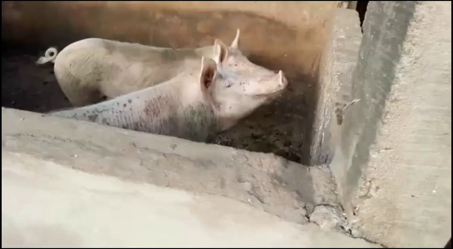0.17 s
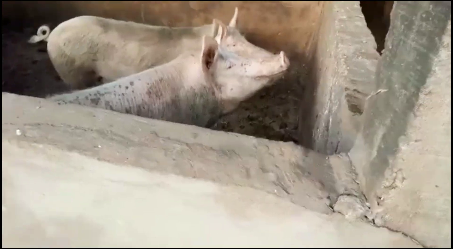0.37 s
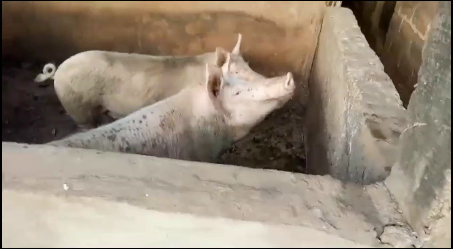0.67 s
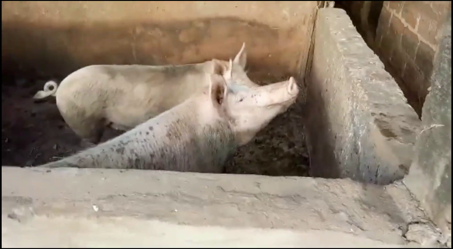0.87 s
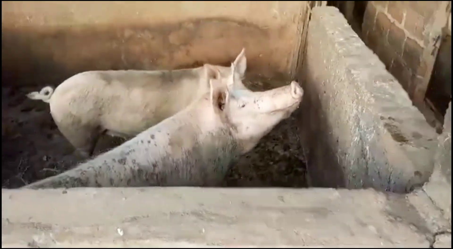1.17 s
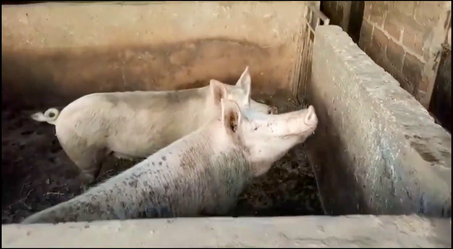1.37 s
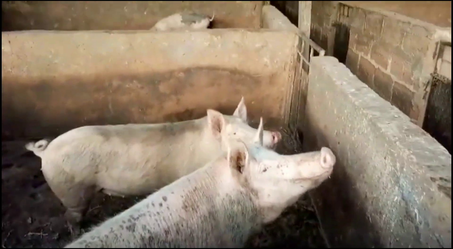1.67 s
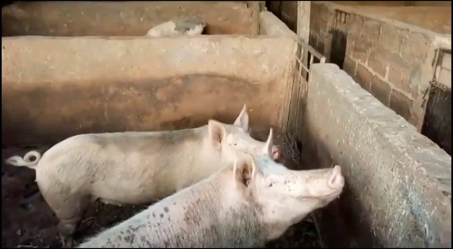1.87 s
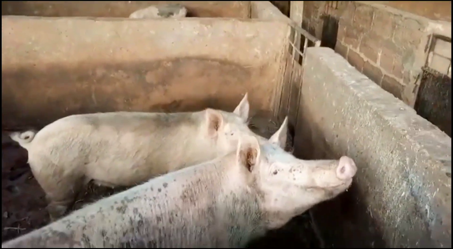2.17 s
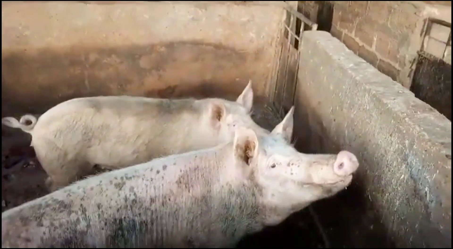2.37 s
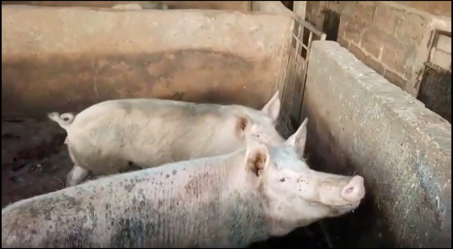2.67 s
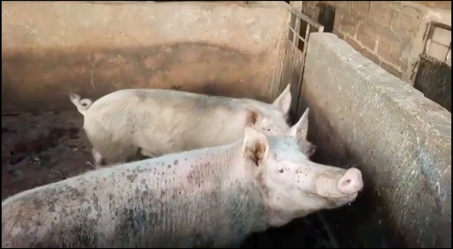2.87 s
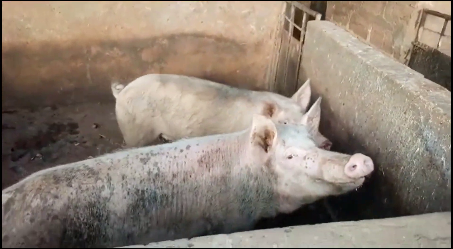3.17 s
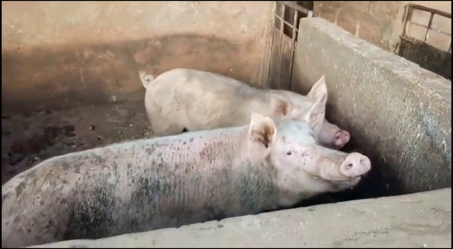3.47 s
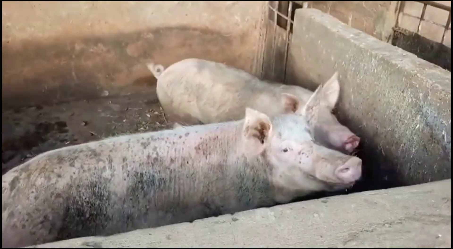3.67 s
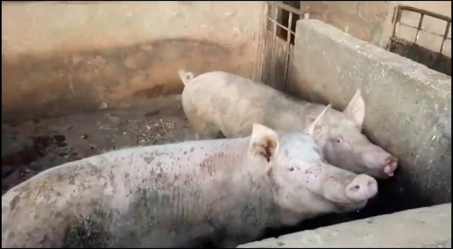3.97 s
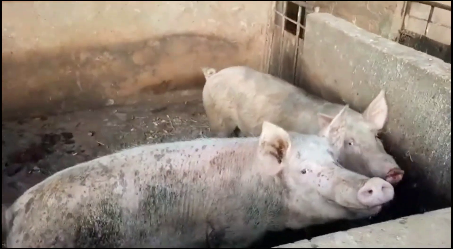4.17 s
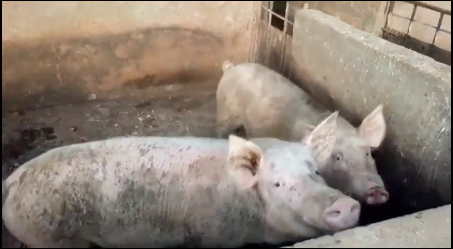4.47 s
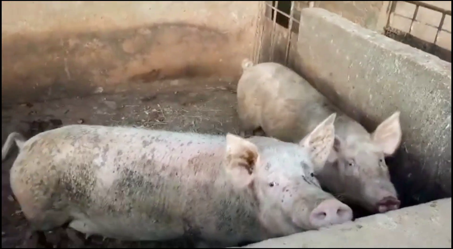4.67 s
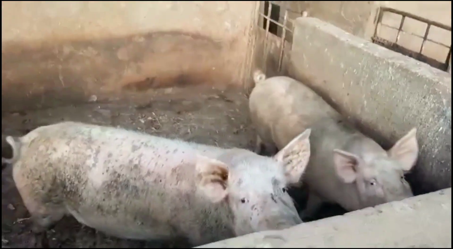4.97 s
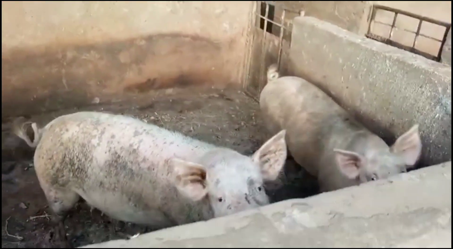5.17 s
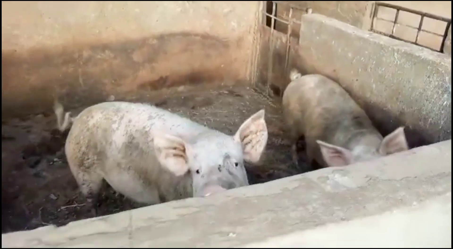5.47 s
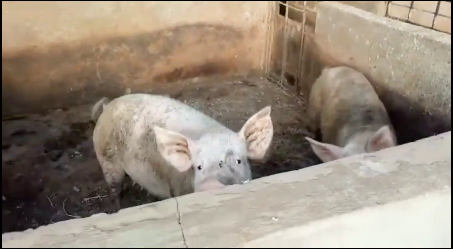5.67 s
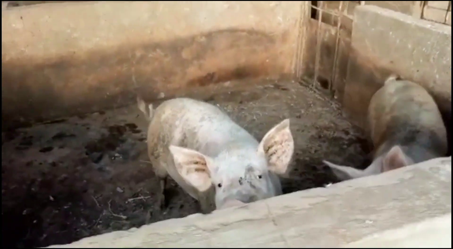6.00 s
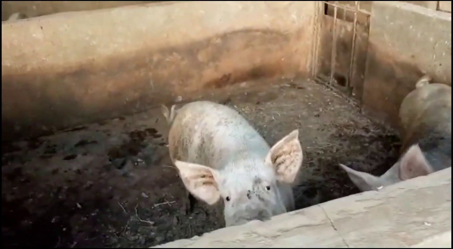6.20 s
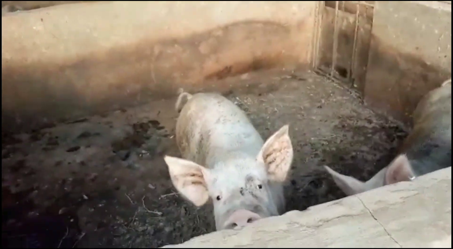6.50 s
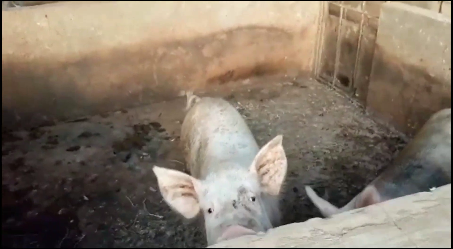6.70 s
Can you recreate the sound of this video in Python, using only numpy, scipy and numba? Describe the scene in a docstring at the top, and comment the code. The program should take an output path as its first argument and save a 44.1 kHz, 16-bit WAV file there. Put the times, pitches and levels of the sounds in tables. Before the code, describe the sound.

Close pigs in a small concrete pen. After a second of quiet yard murmur with light puffs and rustles, three soft low grunts come, then a sharp short bark and a quick run of loud nasal grunts about every half second. Three breathier, spaced grunts follow, with snuffling air between. Short wall echo, a faint distant cricket, one handheld microphone nearby.

```python
"""Two pigs grunting in a concrete pen

Slow flaps of the vocal folds ring a long throat, mouth and snout, and air hisses through the nostrils.
Between grunts come voiceless breaths; grainy noise bursts puff and rustle close by, and an animal
moans faintly far off. Feedback delays echo off the pen walls and a few resonances hum along.
Behind this a cricket whistles short falling chirps, and flickering bands of noise make the yard's murmur.
"""
import sys
import numpy as np
from scipy import signal
from scipy.fft import rfft, irfft, next_fast_len
from scipy.io import wavfile
from numba import njit

SR = 44100
rng = np.random.default_rng(int(sys.argv[2]) if len(sys.argv) > 2 else 0)


def linear_from_db(decibels):
    """Turn decibels (scalar or array-like) into linear amplitude factors; 0 gives 1."""
    return 10 ** (np.asarray(decibels, float) / 20)


def generate_wav(sig):
    """Save sig (samples, or channels by samples) to the path in sys.argv[1] as 16-bit PCM at SR."""
    pcm = np.round(np.clip(np.atleast_2d(sig).T, -1, 1) * 32767).astype(np.int16)
    wavfile.write(sys.argv[1], SR, pcm)


N = 301644

# The grunts in order. Each row: first flap in seconds, flaps per second at the opening, flaps per second
# once steady, stretch of the resonances (factor), snout tilt in dB per kHz.
GRUNT_CALLS = [(1.245, 43, 42, 0.91, 3), (1.812, 45.8, 44, 0.93, -3), (2.314, 55, 45, 0.97, 7),
               (2.671, 52, 50, 1.25, 1), (2.779, 52, 79.4, 1.095, 4.5), (3.119, 51.3, 70.5, 0.95, -4.5),
               (3.57, 56.4, 53, 1.01, -5.5), (4.033, 47.5, 69.5, 1.034, -5), (4.581, 55, 53.5, 0.986, -3),
               (5.2429, 48.3, 47.5, 1, 5.5), (5.826, 58.5, 48.4, 0.98, -0.5),
               (6.376, 61.7, 49.2, 0.99, -4.5)]
# How hard each grunt is pushed, one curve a grunt. Each row: time in seconds, effort in dB,
# mouth opening in dB against effort, snout rasp in dB against the mouth.
EFFORT_CURVES = [
    [(1.24, -52, 1, -24), (1.246, -51, 8.5, -24), (1.31, -49.5, 3.5, -22), (1.324, -60, -11, -28),
     (1.33, -57, -14, -27)],
    [(1.79, -55, -8, -17), (1.82, -47, 0, -18), (1.91, -43, 4.5, -16), (1.972, -54, -14, -17),
     (1.98, -63, -1, -12)],
    [(2.31, -52, 2, -15), (2.394, -41, -3.5, -14), (2.442, -42, -1.5, -14), (2.456, -53, -9, -17),
     (2.48, -61, -15, -20)],
    [(2.663, -61, -9, -30), (2.669, -49, -5, -27), (2.743, -48.5, -14, -27), (2.757, -56, -5, -27),
     (2.765, -37, -19, -23)],
    [(2.77, -46, -8, -20), (2.778, -31.5, -11, -6), (2.8, -24.5, -3.5, -15), (2.835, -27, -7, -10),
     (2.85, -40, -9, -3), (2.88, -53, -6, -21)],
    [(3.11, -63, -26, -15), (3.122, -39.5, -8.5, -12), (3.172, -25.5, -3.5, -14), (3.21, -26.5, -1, -11.5),
     (3.262, -26.5, -2.5, -13.5), (3.275, -28, -8.5, -13), (3.33, -49, -10, -20)],
    [(3.563, -67, 1, -15), (3.575, -46, -5, -5), (3.593, -30, -11.5, -3), (3.612, -30, -13, -8),
     (3.65, -27, -4.5, -6.5), (3.707, -29, -3, -2.5), (3.728, -27.5, -7, -11), (3.742, -35.5, -15, -10),
     (3.78, -44, -10, -10)],
    [(4.025, -58, -8, -31), (4.053, -26.5, -17.5, -20.5), (4.078, -26, -9.5, -23), (4.109, -25, 0.5, -17.5),
     (4.175, -23.5, -11, -9), (4.198, -24, -8.5, -10), (4.212, -34, -4.5, -16), (4.23, -39.5, 2.5, -15)],
    [(4.575, -60, 7.5, -28), (4.605, -43.5, 1, -26), (4.625, -31.5, -5, -9.5), (4.68, -28.5, -3.5, -1),
     (4.735, -28, -2.5, -4), (4.8, -41, -6.5, -5.5)],
    [(5.233, -46, -14, -22), (5.241, -46, -3, -11), (5.291, -34.5, -4, -15), (5.369, -34.5, -2.5, -17.5),
     (5.46, -52, 1, -21)],
    [(5.82, -52, 2, -18), (5.84, -48, -0.5, -18), (5.848, -37, -5, -17), (5.888, -32.5, -5.5, -20),
     (5.91, -35, -7, -13), (5.94, -33, -4, -7), (6.02, -47.5, -4, -11)],
    [(6.368, -48, -8, -18), (6.378, -42.5, -5.5, -18), (6.396, -34, -7.5, -12), (6.412, -32.5, -5, -18),
     (6.5, -30, -6, -5), (6.556, -34, -5, -7.5), (6.62, -48.5, -8.5, -8)],
]


def pigs():
    """Each grunt sounds at its own time, driven by its own curve of effort."""
    out = np.zeros(N)
    for row, curve in zip(GRUNT_CALLS, EFFORT_CURVES):
        at = round(curve[0][0] * SR)
        call = grunt(*row, list(curve))
        out[at:at + len(call)] += call[:N - at]
    return out


# Short grunts are rougher. Each row: length in seconds, roughness 0-1.
ROUGHNESS_BY_LENGTH = [(.1, 0.48), (.2, 0.21)]
# Fast flaps darken the mouth, a bark opens it wide. Each row: flaps per second, mouth tilt in dB per kHz.
VOWEL_TILT_BY_RATE = [(56, 2.5), (68, 0.5), (72, -14), (77, 9.5)]
# How strongly the chest hums. Each row: flaps per second, level in dB against effort.
CHEST_LEVEL_BY_RATE = [(42, 0), (47.5, 0.5), (51, -12.5), (53.5, -1), (60, -18), (71, -10)]
# How strongly flaps in step with the throat sing. Each row: flaps per second, level in dB against effort.
LOCK_LEVEL_BY_RATE = [(66, -28), (69, 2.5), (72, 3), (75, -30)]
# The two lowest snout resonances start high, drop and lift again. Each row: share of the call,
# stretch (factor).
SNOUT_FLARE_CURVE = [(0, 1.3), (.12, 1.3), (.25, 0.975), (.7, 1.01), (1, 1.08)]
# A dull thump under each flap, a row for each airway. Each row: frequency in Hz, first-pass width in Hz,
# level in dB against effort before roughness.
BELLY_THUMPS = [(157, 102, -17.5), (150, 110, -11), (189, 158, -12)]


def grunt(first, opening, steady, stretch, tilt_db, curve):
    """Each fold flap is a click followed by a gust of noise; both ring the airway."""
    second_pig_until_s, head_lowered_s = 2.5, 5
    release_s, tail_s = 0.11, 0.082  # the tail is cut before the release is over
    steady_at_share, last_flaps_share = 0.35, 0.95  # when the rate settles; closing rate against steady
    lowered_rough, belly_rough_db = 0.2, 13.5  # roughness added head down; thump gain at full roughness
    chest_hz, chest_width_hz = 103.7, 37
    # fast steady flaps fall in step with the throat; their tone takes a share from the throat's knocks
    lock_hz, lock_full_at_share, lock_takes_share = 347.3, 0.49, 0.6
    lips_share, lips_per_db = 0.48, 0.004  # share of the stretch; added stretch for each dB of opening

    start, end = curve[0][0], curve[-1][0]
    pig = 1 if first < second_pig_until_s else 2 * (first > head_lowered_s)
    own_rough = np.interp(end - start, *np.transpose(ROUGHNESS_BY_LENGTH))
    rough = own_rough + lowered_rough * (pig == 2)
    t = start + np.arange(round((end - start + tail_s) * SR)) / SR
    along = np.clip((t - first) / (end - first), 0, 1)

    # flaps, each but the first a little early or late
    rate = np.interp(along, [0, steady_at_share, 1], [opening, steady, steady * last_flaps_share])
    cycles = np.cumsum(rate * (t >= first)) / SR
    count = int(cycles[-1]) + 1
    chance = rng.standard_normal((40, 13))[:count]
    flap = np.arange(count)
    flap_cycle = flap + 0.09 * rough * chance[:, 0] * opening / steady * (flap > 0)
    at = np.minimum(np.searchsorted(cycles, flap_cycle + 1e-6), len(t) - 1)

    # every flap drives each resonance differently, the high ones most unevenly
    unevenness_db = np.linspace(1.2, 5.0, 12)
    clicks = np.zeros((12, len(t)))
    clicks[:, at] = linear_from_db(4.1 * rough * chance[:, :1] + unevenness_db * chance[:, 1:]).T
    gust = signal.lfilter([1], [1, -np.exp(-1 / (0.016 * SR))], clicks[-1])  # air flow after each flap
    gust_level = 0.09 * rough * (0.6 + 0.8 * along) * (gust + 0.45)
    gust_share = np.linspace(1, 0.6, 12)[:, None]
    sources = clicks + gust_level * gust_share * rng.standard_normal(len(t))

    effort_db, opening_db, snout_db = in_time(curve + [(end + release_s, -80, 0, -20)], t)
    effort = linear_from_db(effort_db)
    mouth = linear_from_db(effort_db + opening_db)
    snout = mouth * linear_from_db(snout_db)
    # -55 dB at -24 dB effort, following 0.88 of its swing, growing 6 dB; 24 dB more at full roughness
    nostril = linear_from_db(-55 + 0.88 * (effort_db + 24) + 6 * along + 24 * own_rough)

    # glides from the start to the end of the call
    throat_stretch = stretch * (0.94 + (0.98 - 0.94) * along)
    mouth_stretch = (1 + (0.98 - 1) * along) * stretch ** lips_share + lips_per_db * (opening_db + 5)
    nasal_db = 0.5 + (-10 - 0.5) * along
    tilt_swing_db = -8 + (1 + 8) * along  # dB per kHz
    vowel_db = np.interp(steady, *np.transpose(VOWEL_TILT_BY_RATE))
    flare = np.interp(along, *np.transpose(SNOUT_FLARE_CURVE))
    low, mid, high = airway(sources, pig, throat_stretch, mouth_stretch, nasal_db,
                            tilt_db + tilt_swing_db, vowel_db, flare)

    # the chest swells late and rings on
    hum = resonance(effort * sources[0], chest_hz, chest_width_hz)
    hum = resonance(hum, chest_hz, 2 * chest_width_hz)
    hum *= linear_from_db(np.interp(steady, *np.transpose(CHEST_LEVEL_BY_RATE))) * effort.max() / np.abs(hum).max()

    belly_hz, width_hz, belly_db = BELLY_THUMPS[pig]
    thump = resonance(resonance(sources[0], belly_hz, width_hz), belly_hz, 2 * width_hz)
    hiss = nostril_hiss(size=len(t)) * rms_one(gust + 0.7)

    lock = linear_from_db(np.interp(steady, *np.transpose(LOCK_LEVEL_BY_RATE)))
    lock_swell = np.minimum(along / lock_full_at_share, 1) ** 2
    locked = effort * lock * lock_swell * np.sin(2 * np.pi * lock_hz * t)
    throat_level = effort * (1 - lock_takes_share * np.minimum(lock, 1) * along)

    voice = evened(low, throat_level) + evened(mid, mouth) + evened(high, snout)
    body = hum + locked + evened(thump, effort * linear_from_db(belly_db + belly_rough_db * rough))
    return voice + body + evened(hiss, nostril)


# Throat, mouth and snout resonances: a list for the first pig, for the second pig, and for the first with # its
# head lowered. Each row: frequency in Hz, first-pass width in Hz, level in dB.
AIRWAY_RESONANCES = [
    [(347, 73, 1.5), (713.3, 55, 4.5), (1136, 62, 8), (1372, 83, 6.5), (1712, 43, 2.5), (2190, 58, -6),
     (2615, 194, -0.5), (3000, 127, 1), (3540, 82, 6), (3992, 48, 5.5), (5020, 140, -0.5)],
    [(312, 117, 11.5), (563, 190, 3.5), (1130, 58, -3), (1283, 58, 6), (1806, 70, 2), (2130, 75, -0.5),
     (2920, 300, 0), (3520, 310, -3), (4200, 140, 5), (4640, 130, 3), (5300, 210, -8)],
    [(318, 71, 1.5), (715, 78, 4), (1192, 140, 7), (1400, 97, 5), (1633, 64, 4.5), (2185, 47, -7.5),
     (2770, 60, -12), (3076, 39, -1.5), (3567, 61, 3), (3960, 35, 6), (4950, 210, -6)],
]


def airway(sources, pig, throat, mouth, nasal_db, tilt_db, vowel_db, flare=1):
    """Throat, mouth and snout resonances, each driven by its own source; rms 1 a part."""
    wander = 0.015  # every resonance but the lowest drifts by this share in the course of a call
    second_pass_wider = 2.95  # the wider second pass darkens the valleys
    parts = np.zeros((3, len(throat)))
    for k, (hz, width_hz, db) in enumerate(AIRWAY_RESONANCES[pig]):
        ends = 1 + wander * (k > 0) * rng.standard_normal(3)
        drifting = np.interp(np.linspace(0, 2, len(throat)), [0, 1, 2], ends)
        stretch = throat if k == 0 else mouth
        if k in (6, 7):
            stretch = stretch * flare
        centre = hz * drifting * stretch
        r = np.exp(-np.pi * width_hz / SR)
        rung = gliding(gliding(sources[k], centre, r), centre, r ** second_pass_wider)

        lean_db = nasal_db * (k == 1)
        lean_db = lean_db + tilt_db * (k > 5) * (hz - 3300) / 1000
        lean_db = lean_db + vowel_db * (1 < k < 6) * (hz - 1400) / 1000
        # head down, the nasal peak cancels its neighbours between the peaks
        sign = -1 if (pig, k) == (2, 1) else 1
        part = (k > 1) + (k > 5)  # 0 throat, 1 mouth, 2 snout
        parts[part] += sign * linear_from_db(db + lean_db) * rung
    return [rms_one(part) for part in parts]


@njit
def gliding(x, hz, r):
    """Two-pole peak whose centre moves."""
    out, turn = np.zeros(len(x) + 2), 2 * r * np.cos(2 * np.pi * hz / SR)
    for i in range(2, len(x)):
        out[i] = (1 - r * r) / 2 * (x[i] - x[i - 2]) + turn[i] * out[i - 1] - r * r * out[i - 2]
    return out[:len(x)]


# Colour of the nostril air. Each row: frequency in Hz, relative density in dB per Hz.
HISS_SPECTRUM = [(2650, -6.5), (4500, -2), (6040, -7.5), (7590, -10), (8820, -10.5), (12900, -35.5),
                 (14700, -27), (15500, -23)]
# Whistling edges of the hiss. Each row: frequency in Hz, width in Hz, level in dB.
NOSTRIL_PEAKS = [(5280, 78, -11), (7530, 230, -1)]


def nostril_hiss(size):
    """Bright noise with a few whistling peaks, rolled off below about 4 kHz."""
    air = band(band(shaped_noise(HISS_SPECTRUM, size=size), 3800, 22000), 4200, 20000)
    whistles = sum(linear_from_db(db) * resonance(air, hz, width_hz) for hz, width_hz, db in NOSTRIL_PEAKS)
    return rms_one(air + whistles)


# Unvoiced breaths through the first pig's airway. Each row: start in seconds, end in seconds,
# throat level in dB, mouth level in dB, nostril level in dB, stretch of the resonances (factor).
BREATH_ROWS = [(1.42, 2.15, -68, -55.5, -87, 0.995), (4.878, 5.284, -92, -96, -58.5, 0.7),
               (5.652, 5.905, -59, -57, -65, 0.85), (5.96, 6.142, -47.5, -44, -54, 1.03)]


def breaths():
    """Air alone rings the mouth and snout, fluttering a little."""
    loudest_share, snout_db, vowel_db_per_khz = 0.61, -2, -15  # snout level is against the mouth
    out, flutter, wander = np.zeros(N), linear_from_db(2.0 * drift(59)), drift(4.1)
    for start, end, throat_db, mouth_db, nostril_db, stretch in BREATH_ROWS:
        at, size = round(start * SR), round((end - start) * SR)
        ramp = np.interp(np.arange(size) / size, [0, loudest_share, 1], [0, 1, 0])
        swell = np.sin(np.pi / 2 * ramp)
        shape = stretch * (1 + 0.01 * wander[at:at + size])  # the lips never rest
        air = rng.standard_normal(N // 4)[:size]
        low, mid, high = airway([air] * 11, 0, shape, shape, 0, 0, vowel_db_per_khz)
        breath = linear_from_db(throat_db) * low + linear_from_db(mouth_db) * (mid + linear_from_db(snout_db) * high)
        out[at:at + size] += swell * (breath + linear_from_db(nostril_db) * nostril_hiss(size=size))
    return out * flutter


def voice_notch(x):
    """A narrow notch near 2.4 kHz in the pigs' voices and breaths."""
    return x - resonance(x, hz=2430, width_hz=260)


# Puffs of air and rustles. Each row: peak time in seconds, peak level in dB, centre in Hz,
# width in octaves, fade t60 in seconds.
PUFF_ROWS = [(0.139, -59.5, 4200, 1.4, 0.075), (.56, -49.5, 913, 0.11, 0.29), (.59, -48, 430, 2.75, 0.43),
             (0.588, -53, 5360, 1.6, 0.26), (0.658, -49, 3600, 2.1, 0.03), (.8, -70, 12500, 0.66, 0.97),
             (.836, -58, 5000, 1.1, 0.047), (0.891, -51, 5800, 1.2, 0.042),
             (0.983, -50.5, 6600, 1.1, 0.041), (1.444, -51, 3000, 2.6, 0.14),
             (1.975, -61, 7960, 0.68, 0.33), (2.469, -57, 6900, 0.59, 0.44),
             (3.536, -49.5, 1720, 3.7, 0.16), (4.3, -52, 5000, 1.65, 0.31), (4.546, -51.5, 4970, 1.5, 0.35),
             (5.106, -43, 1420, 1.02, 0.092), (5.555, -68, 6400, .12, 0.11), (6.039, -48, 3760, 0.3, .35),
             (6.009, -48.5, 2420, 0.38, .4), (6.065, -49, 2170, 0.24, .25)]


def puffs():
    """Short grainy noise bursts, each in its own band, cut off 0.4 s after the peak."""
    out, t = np.zeros(N), np.arange(N) / SR
    for s, db, hz, octaves, t60 in PUFF_ROWS:
        rise = 0.05 * t60
        near = (t > s - rise) & (t < s + 0.4)
        since = t[near] - s
        shape = np.minimum(1 + since / rise, 1) * linear_from_db(-60 * np.maximum(since, 0) / t60)
        low_hz, high_hz = hz / 2 ** (octaves / 2), hz * 2 ** (octaves / 2)
        grit = rng.standard_normal(N // 10)[:near.sum()]
        grit = band(grit * abs(grit), low_hz, high_hz)  # squaring with the sign kept makes it grainy
        out[near] += linear_from_db(db) * shape * rms_one(band(grit, low_hz, high_hz))
    return out


# The far moan, heard while its pitch is between those of the first and last rows.
# Each row: time in seconds, pitch in Hz, level in dB.
MOAN_CURVE = [(.9, 172.6, -67), (.95, 172.5, -60), (1.05, 182.8, -59), (1.15, 195, -53), (1.22, 199, -58)]
# Its partials. Each row: multiple of the pitch, level in dB.
MOAN_OVERTONES = [(1, 4), (2, -2), (4, -0.5)]


def moan():
    """A few clean partials on a rising, trembling pitch."""
    hz, db = in_time(MOAN_CURVE, np.arange(N) / SR)
    phase = 2 * np.pi * np.cumsum(hz * (1 + 0.028 * drift(31))) / SR
    sounding = (hz > MOAN_CURVE[0][1]) * (hz < MOAN_CURVE[-1][1])
    tone = sum(linear_from_db(g + 2.0 * drift(8.1)) * np.sin(k * phase) for k, g in MOAN_OVERTONES)
    return linear_from_db(db) * sounding * tone


# Tones that ring on after the close sounds, some from the pen, the 142 and 250 Hz ones the belly lingering.
# Each row: frequency in Hz, level in dB, decay t60 in seconds.
RINGING_TONES = [(99.9, 4, 0.75), (141.6, 7.5, 0.5), (250, 6, 0.32), (365.2, -1.5, 0.09),
                 (343.5, -7.5, 0.46), (723, -12, 0.36), (1080, -4, 0.27)]


def pen(x):
    """Ten feedback delays between hard walls, duller each round, and a few tones that ring on."""
    t60_s, wall_cut_hz, echo_db = 0.48, 4450, -16
    size = next_fast_len(N + SR)
    turn = np.exp(-2j * np.pi * np.arange(size // 2 + 1) / size)  # a delay of one sample
    dull = np.exp(-2 * np.pi * wall_cut_hz / SR)
    lags = [523, 641, 773, 887, 1013, 1163, 1297, 1451, 1613, 1801]  # samples
    echo = 0
    for k, lag in enumerate(lags):
        loop = linear_from_db(-60 * lag / SR / t60_s) * (1 - dull) / (1 - dull * turn) * turn ** lag
        echo = echo + (-1) ** k * loop / (1 - loop)
    out = linear_from_db(echo_db) * irfft(rfft(x, size) * echo, size)[:N]
    for hz, db, t60 in RINGING_TONES:
        out += linear_from_db(db) * resonance(x + 1e-18, hz, np.log(1000) / (np.pi * t60))
    return out


# The cricket's level. Each row: time in seconds, level in dB.
CRICKET_LEVEL = [(0, -68), (1.4, -65), (2.4, -76), (3.9, -59), (4.8, -72), (5.6, -61.5), (6.84, -64.5)]


def cricket():
    """A steady train of short whistles that hold, then drop in pitch."""
    chirps_per_s, chirp_at_s, chirp_s = 11, 5.521, 0.036  # one chirp starts at chirp_at_s
    top_hz, fall_hz = 8760, 814
    t = np.arange(N) / SR
    since_chirp_s = ((t - chirp_at_s) * chirps_per_s % 1) / chirps_per_s
    along = np.minimum(since_chirp_s / chirp_s, 1)
    hz = top_hz - fall_hz * along ** 2.3
    shape = np.sin(np.pi * along ** 0.8)
    return linear_from_db(in_time(CRICKET_LEVEL, t)[0]) * shape * np.sin(2 * np.pi * np.cumsum(hz) / SR)


# Loudness of the yard. Each row: time in seconds, low murmur in dB, airy hiss in dB.
YARD_LEVELS = [(0, -54.5, -56), (.25, -63, -80), (.52, -55.5, -79.5), (.62, -53.5, -67),
               (1.4, -52.5, -63.5), (2.05, -51, -63.5), (2.6, -55.5, -66), (3.98, -54.5, -64.5),
               (5.0, -55, -60.5), (5.62, -54, -65.5), (6.3, -50.5, -64), (6.84, -56.5, -68.5)]
# Colour of the yard. Each row: frequency in Hz, relative density in dB per Hz.
YARD_SPECTRUM = [(18, -56), (30, -16.5), (97, 2.5), (208, -7), (360, -8.5), (876, -17), (1680, -13.5),
                 (2840, -28), (5910, -29), (7680, -23), (11400, -52.5), (15600, -43)]


def yard(patchy_db):
    """Half-octave bands of noise that flicker on their own and follow the level of their range."""
    low, airy = in_time(YARD_LEVELS, np.arange(N) / SR)
    # murmur, its middle, airy hiss, insect hiss, the faint top of the airy hiss, 24 dB lower
    levels_db = [low, low - 5.5, airy, -70, airy - 24]
    range_edges_hz = [600, 2300, 6500, 10000]
    ranges, edges = np.zeros((5, N)), 30 * 2 ** np.arange(0, 9.6, 0.5)
    white = [shaped_noise(YARD_SPECTRUM, size=N), shaped_noise(YARD_SPECTRUM, size=N)]
    for k, (a, b) in enumerate(zip(edges, edges[1:])):
        which = np.searchsorted(range_edges_hz, np.sqrt(a * b))
        steadiness = 0.4 if which == 3 else 1  # insects sing steadily
        flicker_db = patchy_db * (drift(6.3) + 4.06 * drift(13.6)) * steadiness
        ranges[which] += band(band(white[k % 2], a, b), a / 1.023, b * 1.36) * linear_from_db(flicker_db)
    return sum(linear_from_db(db) * rms_one(r) for db, r in zip(levels_db, ranges))


def rms_one(x):
    """The signal scaled to rms 1."""
    return x / np.sqrt(np.mean(x ** 2) + 1e-20)


def evened(part, envelope):
    """The part under its envelope, as strong overall as the envelope asks."""
    return rms_one(part * envelope) * np.sqrt(np.mean(envelope ** 2))


def in_time(rows, t):
    """Each column after the first, drawn as straight lines over time."""
    s, *columns = np.transpose(rows)
    return [np.interp(t, s, c) for c in columns]


def resonance(x, hz, width_hz):
    """Two-pole peak with gain 1 on top."""
    r = np.exp(-np.pi * width_hz / SR)
    poles = [1, -2 * r * np.cos(2 * np.pi * hz / SR), r * r]
    return signal.lfilter([(1 - r * r) / 2, 0, (r * r - 1) / 2], poles, x)


def band(x, low_hz, high_hz):
    """Butterworth band-pass."""
    edges_hz = [low_hz, min(high_hz, 0.45 * SR)]
    return signal.sosfilt(signal.butter(2, edges_hz, "band", fs=SR, output="sos"), x)


def drift(rate):
    """Slow chance of spread 1: noise low-passed at rate Hz, computed every 40 samples."""
    r = np.exp(-80 * np.pi * rate / SR)
    slow = signal.lfilter([1], [1, -2 * r, r * r], rng.standard_normal(N // 40 + 2002))[2000:]
    return np.interp(np.arange(N) / 40, np.arange(len(slow)), rms_one(slow))


def shaped_noise(spectrum, size):
    """Noise coloured by a spectrum, rms 1."""
    hz, db = np.transpose(spectrum)
    f = np.maximum(np.arange(size // 2 + 1) * SR / size, 10)
    gain = linear_from_db(np.interp(np.log(f), np.log(hz), db))
    return rms_one(irfft(rfft(rng.standard_normal(size)) * gain, size))


def scene():
    """Pigs, puffs and moan ring the pen, over the yard and the cricket."""
    voices = pigs() + breaths()
    close = voice_notch(voice_notch(voices)) + puffs() + moan()
    return (close + pen(close) + yard(patchy_db=0.75) + cricket())[None]


def band_limit(x):
    """A steep low-pass at the top of the band."""
    return signal.sosfilt(signal.butter(12, 15710, fs=SR, output="sos"), x)


def record(dry):
    """The microphone drops the deepest bass, below 55 Hz."""
    mix = signal.sosfilt(signal.butter(2, 55, "high", fs=SR, output="sos"), dry)
    return band_limit(mix)


dry = scene()
out = record(dry)
generate_wav(out)
```